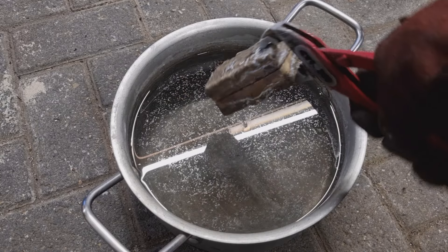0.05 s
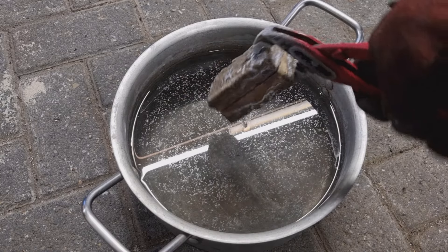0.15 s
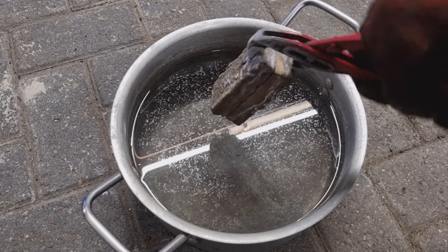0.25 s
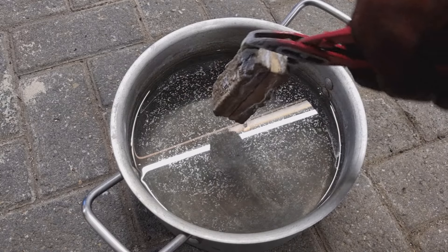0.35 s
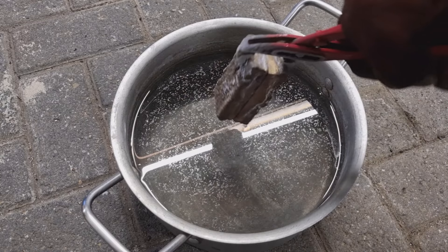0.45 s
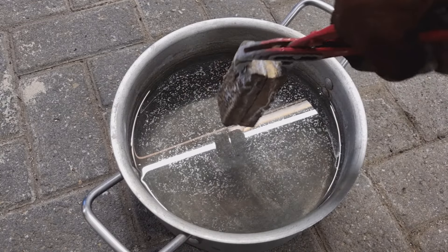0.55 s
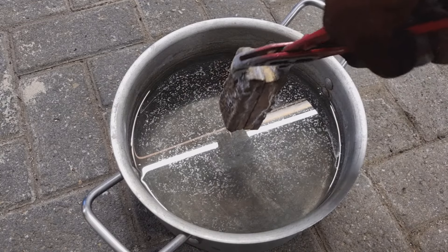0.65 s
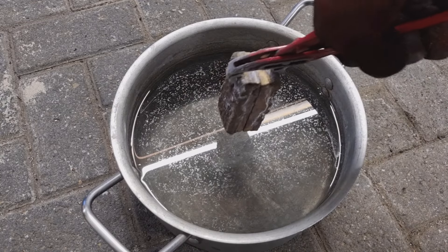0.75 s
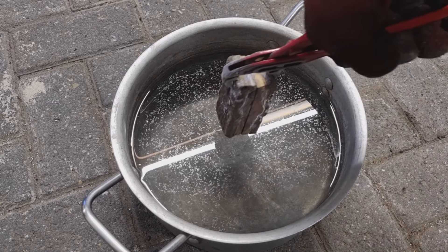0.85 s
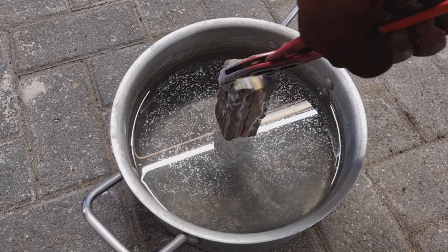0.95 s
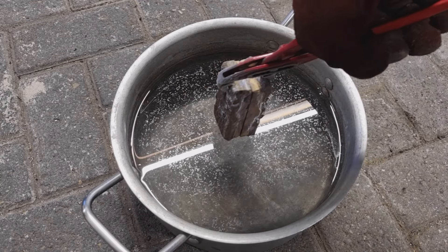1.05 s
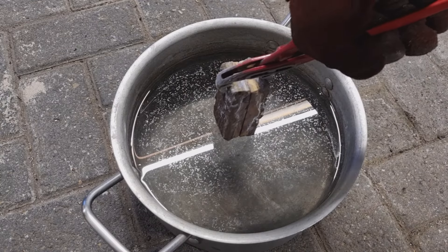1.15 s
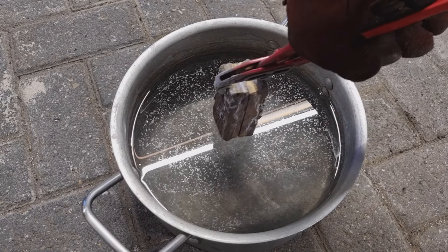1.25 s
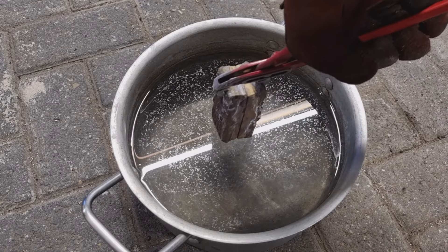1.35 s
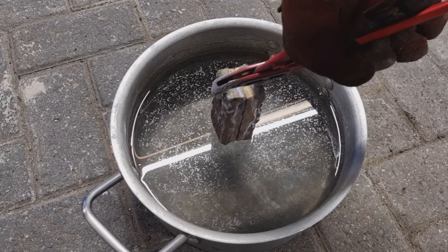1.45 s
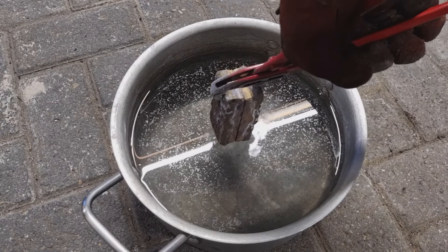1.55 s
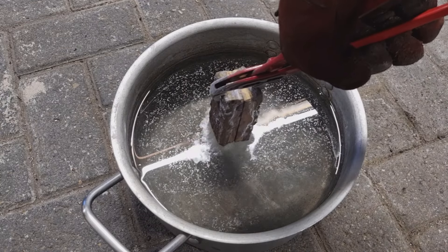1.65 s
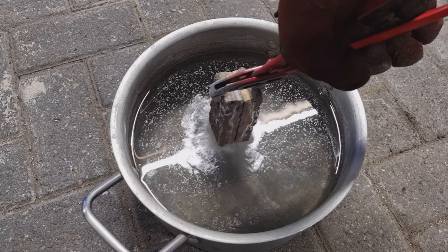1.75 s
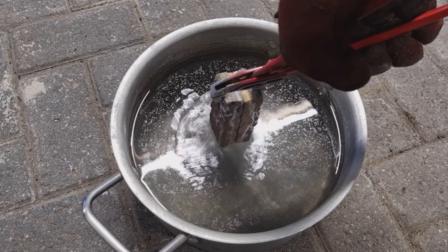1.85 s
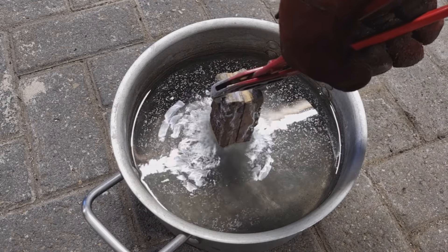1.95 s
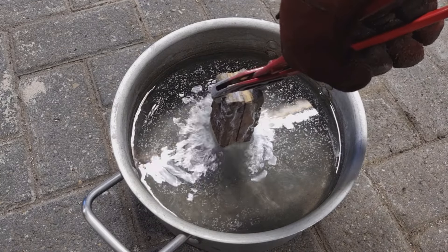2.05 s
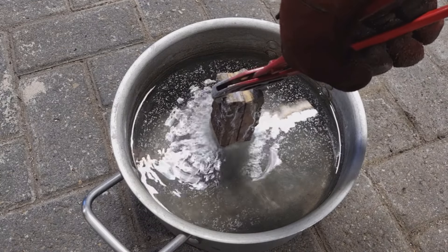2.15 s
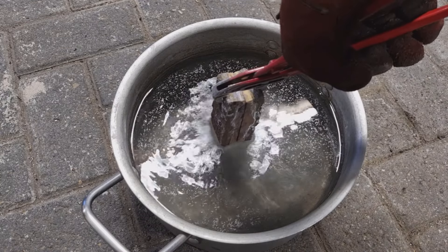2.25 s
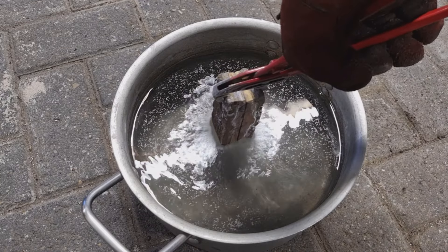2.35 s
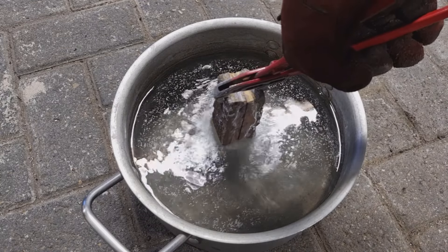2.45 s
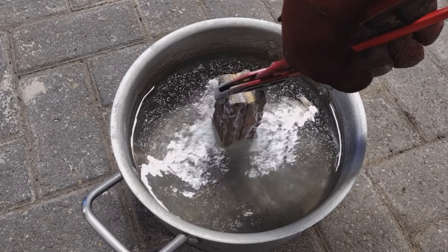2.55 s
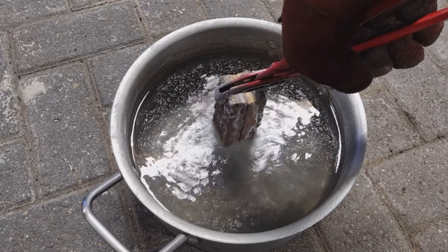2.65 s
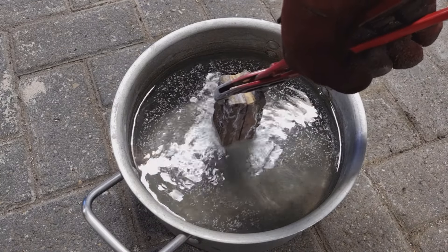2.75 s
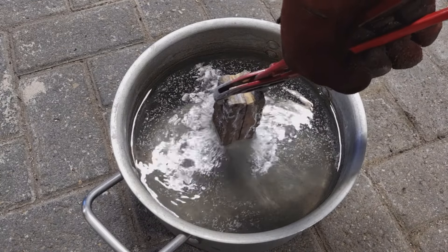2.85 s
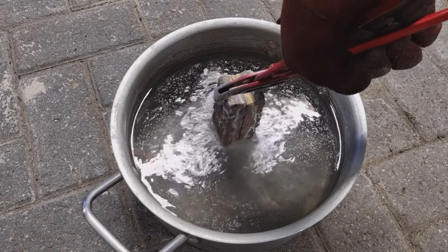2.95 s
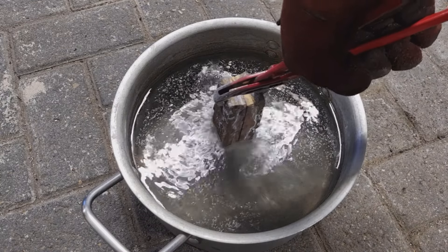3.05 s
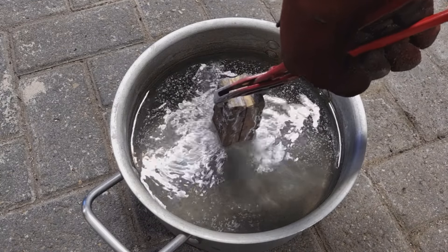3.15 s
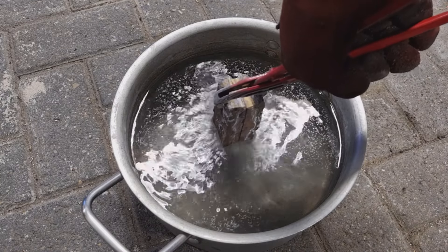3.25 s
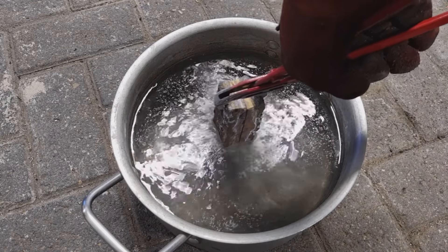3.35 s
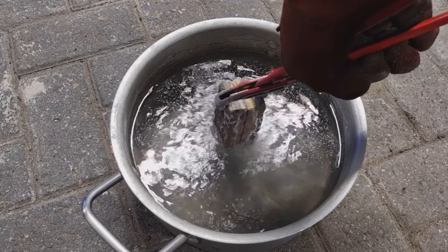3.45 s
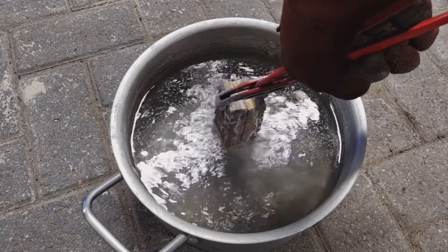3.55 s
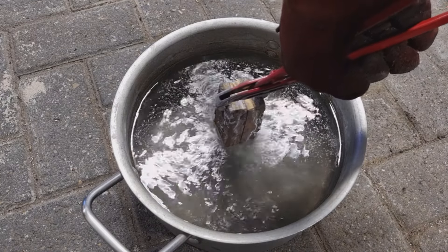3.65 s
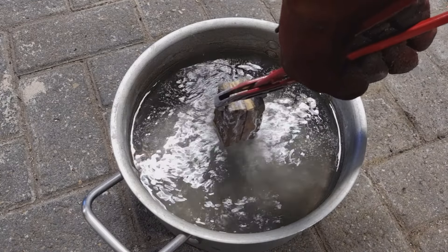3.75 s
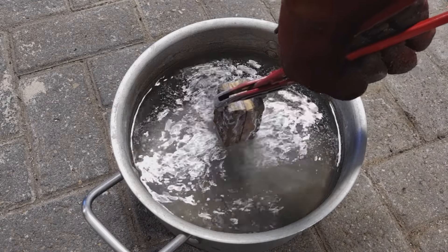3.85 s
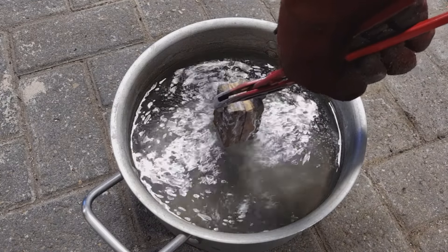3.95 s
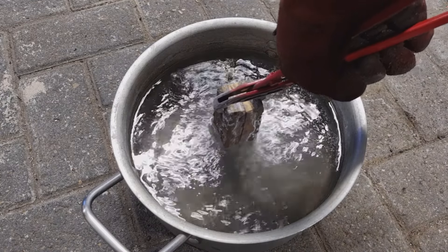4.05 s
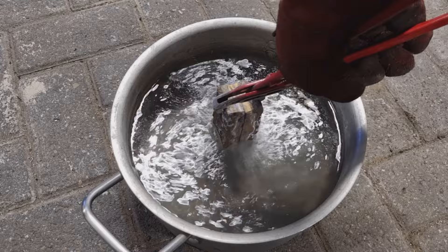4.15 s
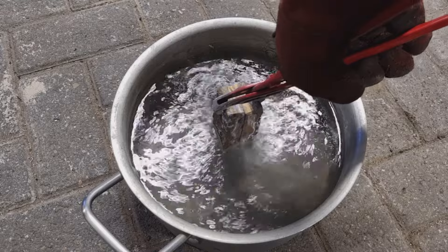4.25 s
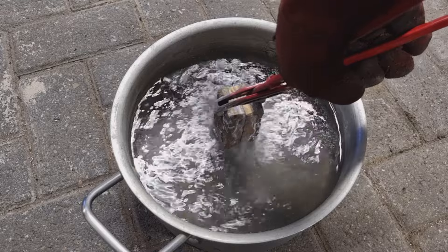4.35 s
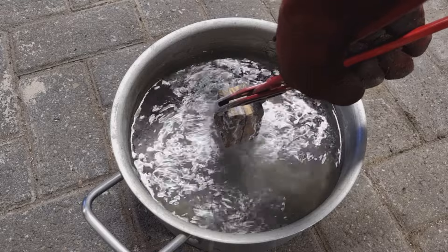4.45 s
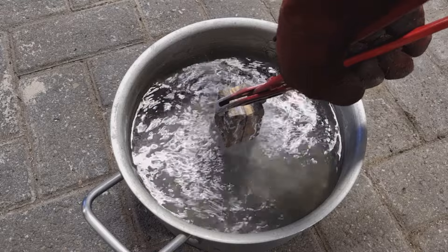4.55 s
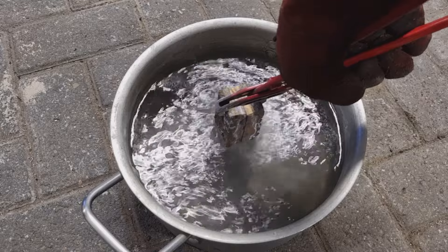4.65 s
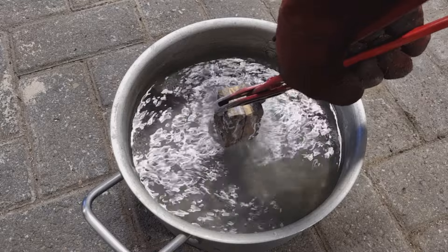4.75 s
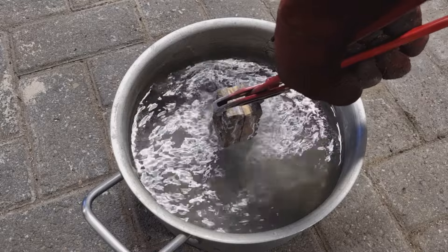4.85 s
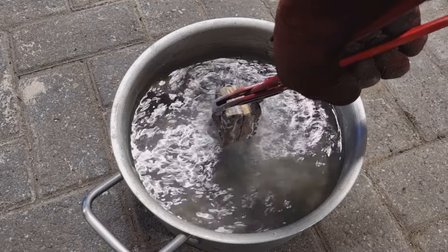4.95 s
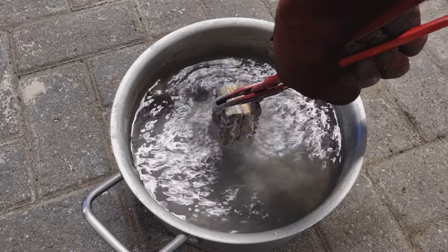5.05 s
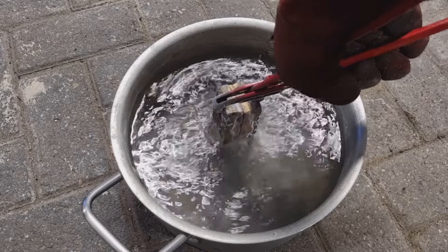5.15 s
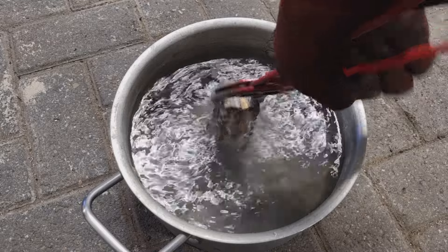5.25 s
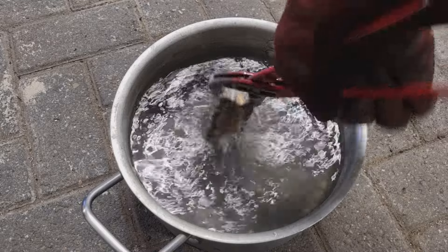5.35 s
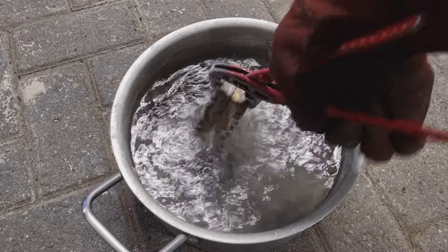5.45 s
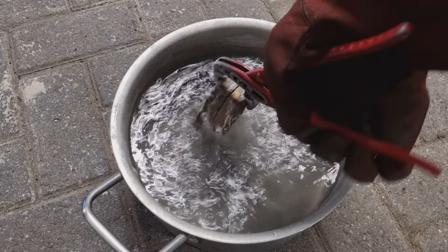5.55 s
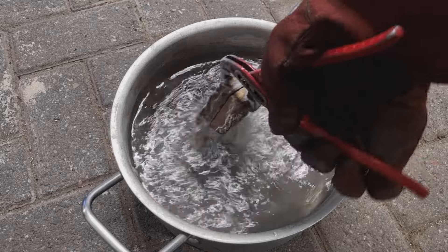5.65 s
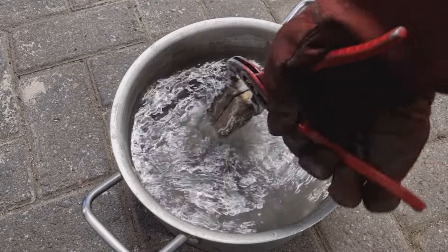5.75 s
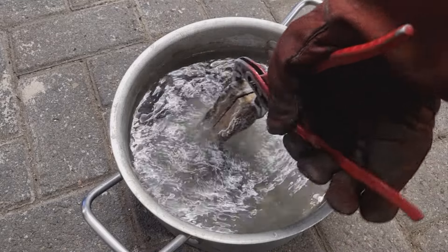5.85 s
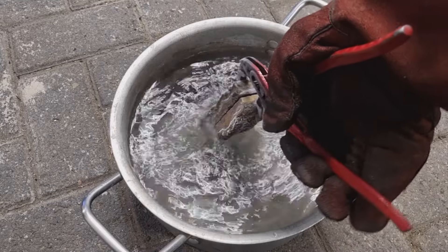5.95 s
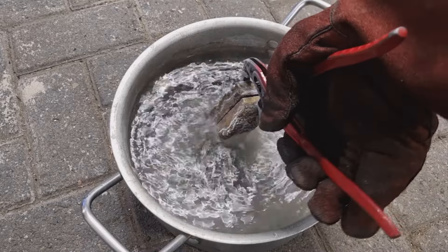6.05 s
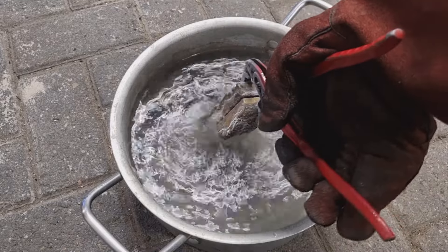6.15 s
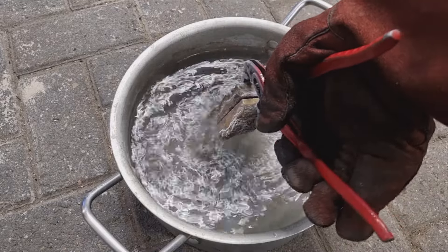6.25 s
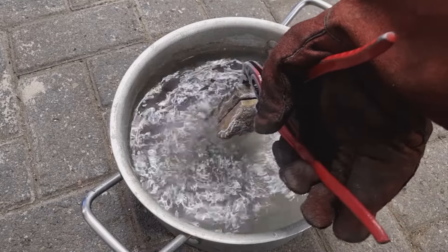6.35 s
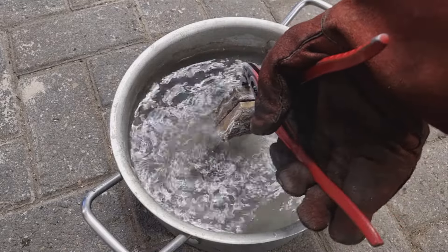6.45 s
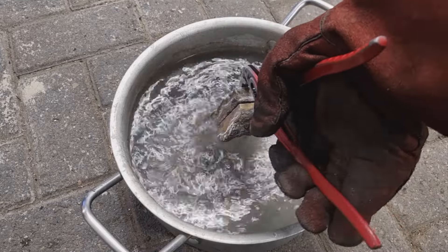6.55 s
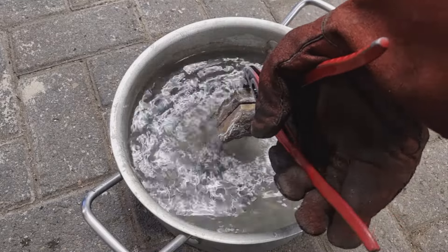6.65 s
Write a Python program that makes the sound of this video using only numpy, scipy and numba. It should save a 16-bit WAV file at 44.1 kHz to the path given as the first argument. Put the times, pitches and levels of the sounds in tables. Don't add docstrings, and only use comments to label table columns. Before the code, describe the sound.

A hot metal bar held in pliers dips into a pot of water, spits with a falling howl, then boils and hisses loudly.

```python
import sys
import numpy as np
from scipy import signal
from scipy.fft import rfft, irfft, next_fast_len
from scipy.io import wavfile
from numba import njit

SR = 44100
rng = np.random.default_rng(int(sys.argv[2]) if len(sys.argv) > 2 else 0)


def master(y):
    cut = np.clip(np.atleast_2d(y).T, -1, 1)
    pcm = np.round(cut * 32767)
    wavfile.write(sys.argv[1], SR, pcm.astype(np.int16))


def linear_from_db(decibels):
    return 10 ** (np.asarray(decibels, float) / 20)


N = 295911
TIME = np.arange(N) / SR
SIZE = next_fast_len(N + SR // 4)
HZ = np.maximum(np.fft.rfftfreq(SIZE, 1 / SR), 1)


def rms_one(x):
    return x / np.sqrt(np.mean(x ** 2) + 1e-20)


def in_time(rows, before=-120):
    s, *columns = np.transpose(rows)
    return [np.interp(TIME, s, c, left=before) for c in columns]


def at_hz(points):
    hz, values = np.transpose(points)
    return np.interp(np.log(HZ), np.log(hz), values)


def shaped(x, response):
    return irfft(rfft(x, SIZE) * response, SIZE)[..., :N]


def resonance(hz, width_hz):
    return 1 / (1 + 1j * (HZ / hz - hz / HZ) * hz / width_hz)


def drift(rate_per_s):
    r = np.exp(-40 * np.pi * rate_per_s / SR)
    noise = rng.standard_normal(N // 20 + 2002)
    slow = signal.lfilter([1], [1, -2 * r, r * r], noise)[2000:]
    return np.interp(np.arange(N) / 20, np.arange(len(slow)), rms_one(slow))


def lifts(rows, rise_s, fall_s):
    out = np.zeros(N)
    for s, db in rows:
        start = round(s * SR)
        t = TIME[start:][:SR // 2] - s
        out[start:][:len(t)] += db * (1 - np.exp(-t / rise_s)) * np.exp(-t / fall_s)
    return out


def collapses(per_s, spread_db, clump_db, surge=0):
    sizes = linear_from_db(spread_db * np.minimum(rng.exponential(1, N), 5)) * rng.choice([-1, 1], N)
    chance = per_s * linear_from_db(clump_db * (drift(70) + surge)) / SR
    return sizes * (rng.random(N) < chance)


# pitch in Hz, width in Hz, level in dB.
POT_MODES = [(678, 177, 6.5), (845, 27, -2), (1120, 110, -9), (1200, 191, 12), (12600, 380, -10),
             (2045, 95, 5), (2610, 206, -1.5), (2820, 65, 3.5), (3202, 53, 1), (3468, 81, 6.5),
             (3740, 100, 1.5), (4280, 620, 0), (4810, 63, 5.5), (5580, 280, -5.5), (7000, 580, -7),
             (8880, 390, -5.5)]


def in_pot(x, lowest_hz=530):
    modes = 1 + sum(linear_from_db(db) * resonance(hz, width_hz) for hz, width_hz, db in POT_MODES)
    return shaped(x, modes / np.sqrt(1 + (lowest_hz / HZ) ** 22))


def hiss(spectrum, per_s, spread_db, clump_db, smooth, patchy_db, surge=0, count=7, flicker_per_s=18.5):
    raw = rms_one(collapses(per_s, spread_db, clump_db, surge)) + smooth * rng.standard_normal(N)
    raw = rfft(raw, SIZE) * linear_from_db(at_hz(spectrum))
    centres_hz = np.geomspace(spectrum[0][0], spectrum[-1][0], count)
    place = np.interp(np.log(HZ), np.log(centres_hz), np.arange(count))
    out = np.zeros(N)
    for k in range(count):
        band = irfft(raw * np.clip(1 - abs(place - k), 0, 1), SIZE)[:N]
        out += band * linear_from_db(patchy_db * drift(flicker_per_s))
    return out


def single(rows, swell_s, wobble_db):
    out, t = np.zeros(N + SR), np.arange(SR // 8) / SR
    wobble = linear_from_db(wobble_db * np.tanh(drift(150)))
    for s, db, hz, t60_s, rise in rows:
        t60_s = max(t60_s, .005)
        shape = (1 - np.exp(-t / swell_s)) * linear_from_db(-60 * t / t60_s)
        cycles = hz * (t * (1 - rise / 2) + rise * t ** 2 / t60_s)
        out[round(s * SR):][:len(t)] += linear_from_db(db) * shape / shape.max() * np.sin(2 * np.pi * cycles)
    return out[:N] * wobble


def bursts(rows, cycles, swell_s):
    out, t = np.zeros(N + SR), np.arange(SR // 8) / SR
    patter = collapses(2500, 0.39, 1.0)
    for s, db, hz, t60_s in rows:
        b, a = signal.iirpeak(hz, cycles, SR)
        start = round(s * SR)
        shape = (1 - np.exp(-t / swell_s)) * linear_from_db(-60 * t / max(t60_s, .01))
        burst = np.resize(patter[start:], len(t)) * shape
        burst = signal.lfilter(b, a, signal.lfilter(b, a, burst))
        out[start:][:len(t)] += linear_from_db(db) * burst / abs(burst).max()
    return in_pot(out[:N])


# frequency in Hz, density in dB per Hz.
RUMBLE_SPECTRUM = [(20, -25), (35, -24), (75, 5), (120, -3.5), (260, -9), (420, -21), (800, -31.5),
                   (1800, -35), (3000, -44.5), (5000, -45), (7500, -58), (10000, -47), (13500, -45),
                   (16000, -47)]
# time in seconds, level in dB.
RUMBLE_GUSTS = [
    (0.0, -62.5),
    (0.192, -62.5),
    (0.346, -62),
    (0.758, -61),
    (0.876, -60.5),
    (1.13, -64.5),
    (1.45, -62),
]
# start in seconds, peak in dB, pitch in Hz, t60 in seconds, pitch rise share.
FAR_HUMS = [
    (1.02, -77, 700, .35, .0),
    (.5, -80, 1180, .2, .0),
    (1.23, -83, 830, .2, .0),
    (.65, -84, 10400, .2, .0),
    (.548, -70, 560, .04, .0),
]


def yard():
    rumble = hiss(RUMBLE_SPECTRUM, per_s=4000, spread_db=.6, clump_db=.6, smooth=6.0, patchy_db=1.4)
    gust_db = in_time(RUMBLE_GUSTS, before=None)[0]
    return linear_from_db(gust_db) * rms_one(rumble) + single(FAR_HUMS, swell_s=.012, wobble_db=1.0)


# start in seconds, peak in dB, width in ms.
PLIER_TICKS = [
    (.275, -56, 1.1),
    (0.3194, -45.5, 0.81),
    (.3385, -54, 0.98),
    (0.8565, -46, .9),
]
# start in seconds, peak in dB, pitch in Hz, t60 in seconds, pitch rise share.
JAW_SQUEAK = [
    (.5565, -64, 2100, .01, .05),
    (.5565, -60, 2600, .01, .05),
    (.563, -72, 2700, .06, .02),
]


def pliers():
    out, ms = np.zeros(N), np.arange(SR // 50) / SR * 1000
    for s, db, width_ms in PLIER_TICKS:
        u = ms / width_ms
        rebound = .5 * u * np.exp(-u / 2.4)
        inward = 3.2 * (1 - np.exp(-u * 8)) * np.exp(-u * 0.8)
        pulse = rebound - inward
        out[round(s * SR):][:len(ms)] += linear_from_db(db) * pulse / abs(pulse).max()
    return out + single(JAW_SQUEAK, swell_s=0.00077, wobble_db=2.0)


# time in seconds, vigour in dB, share of big bubbles in dB.
BOIL_VIGOUR = [(1.483, -99, 0), (1.51, -52, 3), (1.524, -24.5, 10), (1.55, -40.5, 3), (1.603, -43, 10),
               (1.606, -24.5, 0), (1.72, -22, -3), (1.8, -27.5, -0.5), (2.0, -29, 1.5), (2.2, -31.5, 3),
               (2.8, -32, 5), (3.05, -32, -2), (3.3, -30.5, 0), (3.5, -31, -3), (4.4, -29, -1),
               (5.3, -31.5, -1), (5.6, -31, -1), (6.71, -31, 0)]
# start in seconds, lift in dB, share reaching the steam (0-1).
FILM_SURGES = [
    (2.318, 4, 1),
    (2.665, 0.5, .3),
    (2.97, -4, .1),
    (3.305, 0, 0.29),
    (3.35, -4, 0.27),
    (3.592, 7, 0.25),
    (3.665, 4, .3),
    (4.138, 1, .5),
    (6.103, 3.5, .4),
]
# middle in seconds, lift in dB.
FILM_SWELLS = [(1.97, 1), (2.915, 2), (2.94, 2.5), (2.968, 3), (4.45, 0.5), (4.54, 3), (4.58, 3),
               (2.34, 0.5), (2.18, -2), (2.38, 3), (3.2, 1.5), (3.415, 2.5), (3.63, -0.5), (3.78, 3),
               (4.21, 4), (4.31, 1), (4.42, 0.5), (4.502, 3), (4.64, -2), (4.665, -0.5), (4.71, 4.5),
               (4.8, 4), (4.93, 2), (4.99, 3), (5.1, 2), (5.2, 3), (5.27, 3.5), (5.315, 1.5), (5.39, 5.5),
               (5.73, 2.5), (5.8, 1.5), (5.875, 1), (6.19, 2.5), (6.255, 0), (6.315, 1), (6.49, 2),
               (6.61, -0.5)]


def swarm_levels():
    vigour_db, big_db = in_time(BOIL_VIGOUR)
    pocket_hz = in_time(POCKET_GROWTH, before=None)[0]
    swell_db = sum(db * np.exp(-.5 * ((TIME - s) / 0.011) ** 2) for s, db in FILM_SWELLS)
    rise_s, fall_s = 0.0029, 0.051
    lift_db = swell_db + lifts([(s, db) for s, db, share in FILM_SURGES], rise_s, fall_s)
    vent_db = swell_db + lifts([(s, db * share) for s, db, share in FILM_SURGES], rise_s, fall_s)

    def class_db(hz, big_share):
        too_small_db = np.clip(-32 * np.log2(pocket_hz / hz), -38, 0)
        return vigour_db + lift_db + big_share * big_db + 0.43 * drift(2.1) + too_small_db

    large_db, medium_db = class_db(750, 1.33), class_db(1300, 0.41)
    fizz_db = vigour_db + lift_db + 0.43 * drift(14.0)
    tip_s, untip_s, ramp_s = 5.09, 6.34, 0.15
    tipped = np.clip(np.minimum(TIME - tip_s, untip_s + ramp_s - TIME) / ramp_s, 0, 1)
    steam_db = -32.5 + 0.53 * (vigour_db + 29.5) + vent_db + 4 * tipped
    steam_db = steam_db - 120 * (TIME < BOIL_VIGOUR[0][0])
    return large_db, medium_db, fizz_db, steam_db


def bubbles(low_hz, high_hz, cycles, per_s, spread_db, clump_db, surge, count=10):
    clicks = collapses(per_s, spread_db, clump_db, surge)
    dealt = rng.integers(0, count, N)
    swarm = 0
    for k, hz in enumerate(np.geomspace(low_hz, high_hz, count)):
        swarm = swarm + rfft(clicks * (dealt == k), SIZE) * resonance(hz, hz / cycles) ** 2
    return rms_one(in_pot(irfft(swarm, SIZE)[:N]))


# frequency in Hz, density in dB per Hz.
FIZZ_SPECTRUM = [(1500, -33), (1900, 4.5), (3000, 3.5), (5000, -3), (6000, -6)]


def fizz(surge):
    return rms_one(in_pot(hiss(FIZZ_SPECTRUM, per_s=3000, spread_db=1.0, clump_db=1.5, smooth=1.0,
                               patchy_db=1.55, surge=surge)))


# frequency in Hz, density in dB per Hz.
STEAM_SPECTRUM = [(1400, -17.5), (2000, -14), (4200, -7.5), (5200, -0.5), (6500, -3), (8900, -1.5),
                  (12800, 2), (15700, -4.5)]


def steam(surge):
    jet_noise = hiss(STEAM_SPECTRUM, per_s=6800, spread_db=2.6, clump_db=1.3, smooth=1.3, patchy_db=2.7,
                     surge=surge, count=26, flicker_per_s=12)
    return rms_one(in_pot(jet_noise)) + linear_from_db(-9) * flickers()


# start in seconds, peak in dB, pitch in Hz, t60 in seconds.
VAPOUR_TEARS = [(2.314, -21, 2000, 0.16), (2.322, -18, 2940, 0.24), (1.705, -18, 2370, 0.19),
                (4.44, -22, 1600, 0.4), (1.6, -21.5, 6100, 0.16), (4.133, -21, 1570, 0.11),
                (1.483, -62, 1500, .2), (1.512, -52, 1700, .08), (2.313, -20, 4000, .2),
                (1.87, -26, 2700, 0.37), (1.925, -24.5, 2750, 0.21), (5.77, -27, 1200, 0.19),
                (1.725, -26, 2200, .15), (5.09, -24, 4000, .1), (4.136, -22, 2600, .1),
                (3.593, -23, 2500, .15), (3.774, -25, 2200, .1), (3.35, -25, 2800, .07),
                (3.21, -26, 2600, .15), (5.3, -25, 3000, .12), (4.3, -23, 2000, 0.032),
                (3.315, -27, 2600, 0.085), (3.6, -26.5, 720, 0.07), (6.593, -24.5, 900, 0.24)]


def tears():
    return linear_from_db(3.0) * bursts(VAPOUR_TEARS, cycles=1.15, swell_s=0.0044)


# frequency in Hz, density in dB per Hz.
SLOSH_SPECTRUM = [(65, -58), (110, -14.5), (161, 3), (205, -7), (253, 1), (324, -0.5), (387, -9.5),
                  (480, -1.5), (620, -81), (1060, -120)]
# frequency in Hz, density in dB per Hz.
THUMP_SPECTRUM = [(20, -46), (35, -22), (60, 3), (80, 0), (110, 7), (150, -29)]
# time in seconds, level in dB.
SLOSH_LEVEL = [
    (1.5, -82),
    (1.56, -74),
    (1.7, -62),
    (1.92, -45),
    (2.2, -46),
    (2.68, -36),
    (3.05, -45.5),
    (4.7, -42),
    (6.71, -38.5),
]
# start in seconds, lift in dB.
WAVE_LURCHES = [
    (3.7, 5.5),
    (4.58, 6),
    (4.78, 11),
    (5.25, 7),
    (3.22, 3),
    (6.42, 5),
]


def churn():
    lurch_db = lifts(WAVE_LURCHES, rise_s=0.0032, fall_s=0.076)
    since_s = np.maximum(TIME - SLOSH_LEVEL[0][0], 0)
    full_db, lag_db, grow_s = -51, -34, 1.4
    thump_db = full_db + lag_db * np.exp(-(since_s / grow_s) ** 2) + lurch_db
    slosh_db = in_time(SLOSH_LEVEL)[0] + 0.78 * lurch_db
    slosh = rms_one(hiss(SLOSH_SPECTRUM, per_s=300, spread_db=2.5, clump_db=2.0, smooth=1.53, patchy_db=2.5))
    missing = 1 - linear_from_db(0.31 * np.minimum(thump_db - full_db, 0))
    slosh = slosh - missing * shaped(slosh, resonance(157, 140))
    thump = rms_one(hiss(THUMP_SPECTRUM, per_s=60, spread_db=2.5, clump_db=2.5, smooth=1.6, patchy_db=1.4))
    return linear_from_db(slosh_db) * slosh + linear_from_db(thump_db) * thump


def flickers(low_hz=6300, high_hz=15500, count=1100):
    when, where, size = rng.random((3, count))
    start_s = BOIL_VIGOUR[1][0]
    s = start_s + when * (N / SR - start_s)
    hz = low_hz + where * (high_hz - low_hz)
    db = -2.5 * np.log(size + 0.022)
    rows = zip(s, db, hz, [.045] * count, [0] * count)
    return rms_one(in_pot(single(rows, swell_s=0.0074, wobble_db=0.0)))


# start in seconds, peak in dB, pitch in Hz, t60 in seconds.
CONTACT_SPIT = [(1.52, -29, 7000, 0.04), (1.521, -21, 3260, .02), (1.524, -21, 2670, .02),
                (1.526, -24, 2030, 0.021), (1.604, -12, 2664, 0.024), (1.612, -16.5, 2610, .04),
                (1.619, -8.5, 2107, 0.032), (1.631, -16.5, 2050, 0.043), (1.642, -22, 2030, 0.027),
                (1.652, -19, 2020, 0.033), (1.66, -17, 1990, 0.04), (1.675, -16, 2590, 0.034),
                (1.688, -12.5, 1990, 0.021), (1.668, -22, 1760, .03), (1.678, -20, 1600, .03),
                (1.687, -16, 1487, 0.04), (1.7, -20, 2140, .045), (1.735, -16, 2270, 0.041),
                (1.75, -12.5, 2030, 0.047), (1.712, -20, 2470, .035)]


def spit():
    return single([(*row, .01) for row in CONTACT_SPIT], swell_s=.002, wobble_db=2.5)


@njit
def gliding(x, hz, r, sr):
    y = np.zeros(len(x))
    for i in range(2, len(x)):
        turn = 2 * r * np.cos(2 * np.pi * hz[i] / sr)
        y[i] = (x[i] - x[i - 2]) + turn * y[i - 1] - r * r * y[i - 2]
    return y


# time in seconds, pitch in Hz, level in dB.
POCKET_GROWTH = [
    (1.601, 2730, -103),
    (1.607, 2560, -18.5),
    (1.623, 2280, -25),
    (1.66, 1990, -26),
    (1.7, 1370, -25),
    (1.76, 905, -26.5),
    (1.8, 700, -23),
    (1.9, 560, -34),
    (1.97, 586, -97),
]


def pocket(width_hz=230, upper=2.19, upper_db=-7.5):
    hz, level_db = in_time(POCKET_GROWTH, before=None)
    r, clicks = np.exp(-np.pi * width_hz / SR), collapses(3000, 1.8, 1.8)

    def mode(ratio):
        once = gliding(clicks, ratio * hz, r, SR)
        return rms_one(gliding(once, ratio * hz, r ** 3, SR))

    return in_pot(linear_from_db(level_db - 9) * (mode(1) + linear_from_db(upper_db) * mode(upper)))


# start in seconds, peak in dB.
IMPLOSIONS = [(1.69, -3), (2.324, -23), (2.3366, -17), (2.3654, -32), (4.1395, 1), (4.149, -3),
              (2.0545, -9), (2.125, -9), (2.533, -5), (2.67, -5), (3.306, -7), (3.356, -6), (3.8055, -6),
              (5.0939, -7), (5.7272, -8), (6.1035, -2), (6.1814, -2), (6.631, 0)]


def snaps(hz=1680, cycles=1.7):
    out, t = np.zeros(N), np.arange(SR // 100) / SR
    for s, db in IMPLOSIONS:
        decay_db = 60 * t * hz / cycles / 3
        out[round(s * SR):][:len(t)] += linear_from_db(db - 14.0 - decay_db) * np.sin(2 * np.pi * hz * t)
    return in_pot(out)


# time in seconds, peak in dB, pitch in Hz.
LONE_GLUGS = [(2.054, -11.5, 587), (2.124, -9.5, 723), (2.268, -12, 698), (2.367, -12, 664),
              (2.468, -13, 722), (2.53, -13, 1135), (2.668, -14, 1240), (2.883, -17, 627),
              (2.915, -17.5, 714), (3.157, -20, 675), (3.6, -18, 680), (3.672, -18, 791),
              (3.775, -13.5, 1220), (3.804, -16.5, 1245), (4.307, -10, 1310), (4.416, -9.5, 1200),
              (4.493, -12.5, 1256), (4.617, -12, 637), (4.676, -13.5, 692), (4.993, -15.5, 683),
              (5.204, -19.5, 734), (5.388, -17, 635), (5.567, -19, 637), (5.724, -13, 1200),
              (5.775, -23, 1130), (5.877, -15.5, 705), (6.187, -17, 700), (6.271, -13.5, 1160),
              (6.611, -13.5, 654), (6.63, -15, 1257),
              (1.718, -26, 1200), (1.749, -10, 1240), (1.768, -12, 816), (1.78, -13, 1140),
              (1.8, -17, 1145), (1.835, -10.5, 608), (1.862, -19, 627), (1.894, -11.5, 573),
              (1.944, -13, 590), (1.976, -14.5, 644), (2.002, -19, 581), (2.04, -12.5, 734),
              (2.107, -12, 598), (2.201, -18.5, 1200), (2.227, -17, 830), (2.29, -12, 722),
              (2.33, -22, 1330), (2.644, -21, 727), (2.7, -14, 626), (2.72, -14, 1126), (3.184, -15.5, 680),
              (3.73, -17, 1150), (4.383, -22, 688), (4.465, -12, 724), (4.558, -32, 667), (4.802, -26, 627),
              (4.843, -24, 716), (4.913, -21, 687), (5.026, -18.5, 660), (5.151, -19.5, 698),
              (5.248, -21, 710), (5.286, -21, 880), (5.347, -19, 680), (6.161, -22, 583), (6.313, -17, 645),
              (6.348, -17.5, 1196), (6.4, -23, 676), (6.594, -16, 678)]


def glugs():
    lead_s, t60_s, rise = 0.002965, 0.042, 0.1
    rows = [(s - lead_s, db, hz, t60_s, rise) for s, db, hz in LONE_GLUGS]
    return linear_from_db(-7) * single(rows, swell_s=.006, wobble_db=2.5)


# start in seconds, peak in dB, pitch in Hz.
STEAM_JETS = [(1.8562, -25, 10400), (1.95, -12, 8500), (2.3231, -16, 9530), (2.5072, -14, 12600),
              (2.832, -21, 9050), (3.0485, -17, 9520), (3.2056, -15, 11500), (3.8731, -24, 10000),
              (4.0502, -14, 9050), (4.146, -16, 8760), (4.2084, -18, 8970), (4.3056, -9.5, 13400),
              (4.3899, -21, 13000), (4.4353, -31, 9960), (4.5531, -38, 9250), (4.7187, -16.5, 7200),
              (4.7826, -20, 9000), (4.9931, -12, 11200), (5.0824, -23, 7260), (5.2794, -14, 8440),
              (5.3403, -28, 11600), (5.3842, -19, 12300), (5.4361, -27, 9000), (5.476, -11, 8900),
              (5.5897, -18, 8310), (5.6406, -15, 12500), (5.7284, -18, 12700), (5.7653, -27, 12800),
              (5.8052, -20, 9030), (5.8476, -17, 9210), (5.9953, -14.5, 9900), (6.1016, -17, 8850),
              (6.1779, -26, 8790), (6.2462, -16, 9270), (6.3375, -20, 14600), (6.4572, -12, 12900),
              (6.5011, -19, 9320), (6.5465, -19, 11700), (6.5934, -13, 12500)]


def jets():
    return linear_from_db(-6.5) * bursts([(*row, 0.087) for row in STEAM_JETS], cycles=3.0, swell_s=0.0053)


# start in seconds, peak in dB, pitch in Hz.
BUBBLE_PLINKS = [(2.3475, -13, 2820), (2.799, -23, 3500), (3.222, -21, 2700), (3.3054, -15.5, 2100),
                 (3.3536, -11.5, 2710), (3.5149, -28, 2080), (3.5578, -41, 2490), (3.5944, -16, 2060),
                 (3.622, -15, 2540), (3.6664, -21.5, 2090), (4.332, -19, 2050), (4.509, -14, 2000),
                 (4.659, -20, 2800), (4.696, -18, 2080), (4.9707, -18, 3740), (5.1776, -17.5, 2990),
                 (5.307, -14, 2250), (5.7294, -24, 2190), (6.2007, -18.5, 2380), (6.2497, -16, 4100),
                 (6.311, -20, 2110), (6.372, -18.5, 2950), (6.475, -20.5, 3280), (6.6119, -17.5, 2380),
                 (2.345, -11.5, 2070), (2.747, -22, 2050), (2.961, -26, 2110), (3.317, -14, 2780),
                 (3.344, -17, 2090), (3.4068, -17, 2000), (3.7725, -19, 2060), (3.8794, -19.5, 3170),
                 (3.9603, -17.5, 2560), (3.9985, -18.5, 2810), (4.0426, -20, 2790), (4.1885, -18, 2640),
                 (4.2793, -19, 2110), (4.54, -21.5, 3500), (4.7967, -20.5, 2950), (4.9124, -25, 2120),
                 (5.269, -18, 3500), (5.312, -16, 3060), (5.3813, -20, 2850), (5.4811, -19.5, 3640),
                 (5.7091, -19.5, 2800), (5.8, -21, 3000), (5.863, -19, 3050), (6.0393, -18, 3100),
                 (6.2913, -18, 3150), (2.01, -33, 2050)]


def plinks():
    return linear_from_db(-5.5) * bursts([(*row, 0.06) for row in BUBBLE_PLINKS], cycles=4.2, swell_s=.0033)


# start in seconds, peak in dB, pitch in Hz, t60 in seconds, pitch rise share.
BUBBLE_CHIRPS = [(4.2095, -7.5, 655, 0.024, -0.19), (4.221, -13, 1200, 0.017, 0.032),
                 (5.872, -19.5, 1100, 0.028, -0.18), (5.878, -16.5, 800, 0.036, -0.16),
                 (6.1028, -8.5, 850, .009, 0.19), (6.109, -11.5, 1290, 0.034, 0.2),
                 (4.138, -15, 1250, 0.027, 0.02), (4.146, -11.5, 1190, .03, 0.02),
                 (4.143, -17, 1600, .04, 0.0098), (4.155, -14, 1250, 0.032, 0.034),
                 (4.171, -18, 1200, 0.037, 0.044), (2.058, -20, 2700, .06, 0.027),
                 (2.067, -19, 2760, 0.056, -0.026), (6.119, -17.5, 1330, 0.054, .15),
                 (6.134, -20, 1500, .05, 0.21)]


def chirps():
    return single(BUBBLE_CHIRPS, swell_s=.002, wobble_db=2.5)


def boil():
    large_db, medium_db, fizz_db, steam_db = swarm_levels()
    surge = 0.65 * drift(30)
    large = bubbles(540, 952, cycles=4.45, per_s=1300, spread_db=-1.0, clump_db=1.7, surge=surge)
    medium = bubbles(934, 1600, cycles=6.4, per_s=1200, spread_db=0.0, clump_db=1.5, surge=surge)
    swarm = linear_from_db(large_db - 1.2) * large + linear_from_db(medium_db - 3.0) * medium
    swarm = swarm + linear_from_db(fizz_db + 1.1) * fizz(surge) + linear_from_db(steam_db + 1.03) * steam(surge)
    lone = tears() + spit() + snaps() + glugs() + jets() + plinks() + chirps()
    return swarm + lone + churn() + pocket()


# frequency in Hz, likeness (0-1).
PORT_LIKENESS = [(60, 1), (160, 1), (450, 0.8), (740, 0.92), (1220, 0.82), (2010, 0.79), (3330, 0.52),
                 (5500, 0.08), (6800, 0.45), (9080, 0.27), (15000, 0.45)]
# frequency in Hz, left minus right in dB.
PORT_LEAN = [(130, 0), (270, -3), (700, -0.5), (1300, -3), (2500, -1.5), (5000, -3), (6800, -3),
             (8000, 0.5), (8800, 11), (9800, 6), (12000, -0.5), (15000, 0.5)]
# frequency in Hz, left lead in radians.
PORT_LEAD = [(300, 0.039), (780, -0.42), (1400, 1), (2000, 0.78), (3300, 0.61), (4400, 0.6), (6700, 0.051),
             (7500, -0.26)]


def two_ports(x, turns=1.5, stir_per_s=30):
    alike = np.clip(at_hz(PORT_LIKENESS), 0, 1)
    direct = shaped(x, np.sqrt((1 + alike) / 2))
    phase = 2 * np.pi * turns * np.cumsum(drift(stir_per_s)) * stir_per_s / SR
    scattered = np.real(signal.hilbert(x, SIZE)[:N] * np.exp(1j * phase))
    scattered = shaped(scattered, np.sqrt((1 - alike) / 2))
    sign = np.array([[1], [-1]])
    balance = linear_from_db(sign * at_hz(PORT_LEAN) / 2 - 0.73)
    return shaped(direct + sign * scattered, balance * np.exp(.5j * sign * at_hz(PORT_LEAD)))


# time in seconds, left minus right in dB.
ARM_SHADE = [
    (0, -1),
    (.7, -2),
    (1.3, -1),
    (1.6, 0),
    (3.8, -.5),
    (4.3, 0),
    (5.7, .5),
    (6.2, 2.2),
    (6.71, 2.7),
]


def scene():
    lean_db = in_time(ARM_SHADE)[0] / 2
    return two_ports(boil() + pliers() + yard()) * linear_from_db([lean_db, -lean_db])


def roll_off(x):
    return signal.sosfilt(signal.butter(12, 15800, fs=SR, output="sos"), x)


def record(dry):
    mix = 0.8 * np.tanh(dry / 0.81)
    return roll_off(mix)


dry = scene()
out = record(dry)
master(out)
```